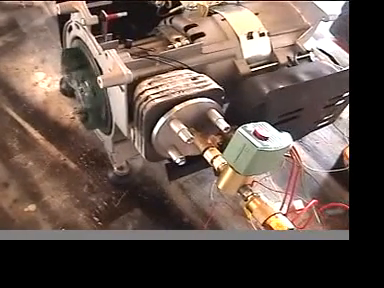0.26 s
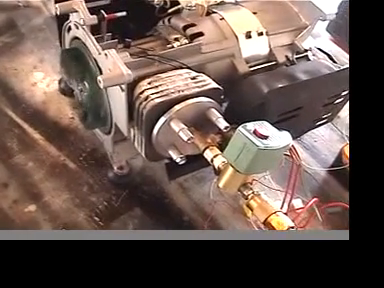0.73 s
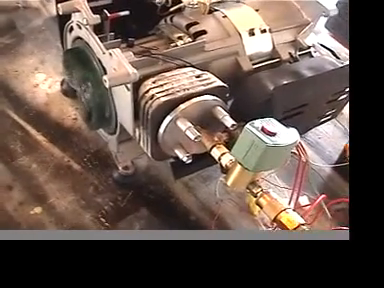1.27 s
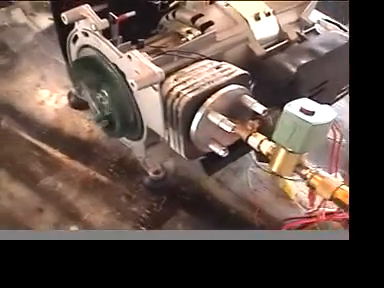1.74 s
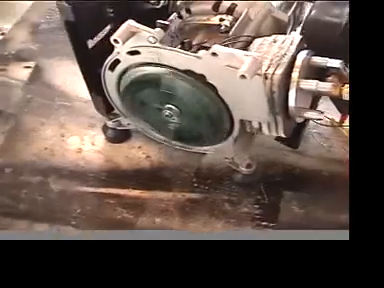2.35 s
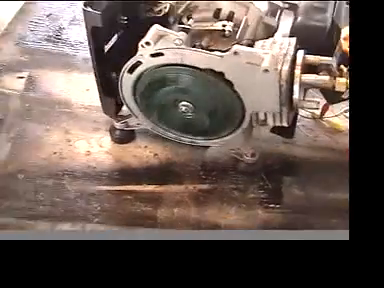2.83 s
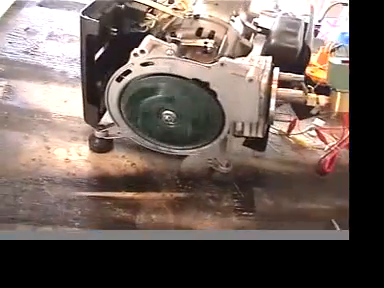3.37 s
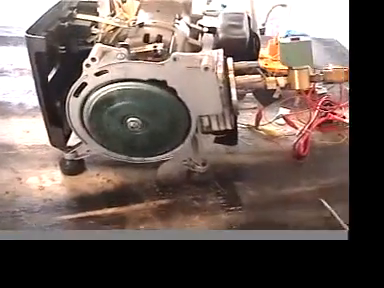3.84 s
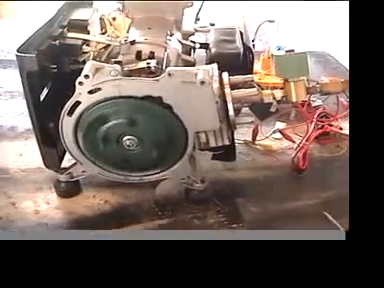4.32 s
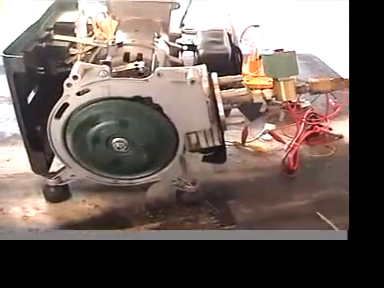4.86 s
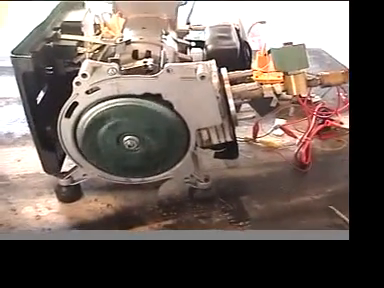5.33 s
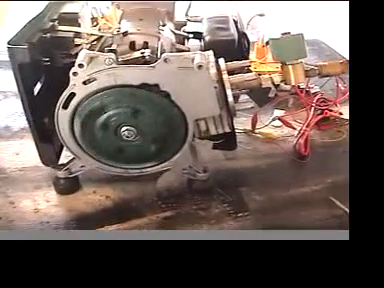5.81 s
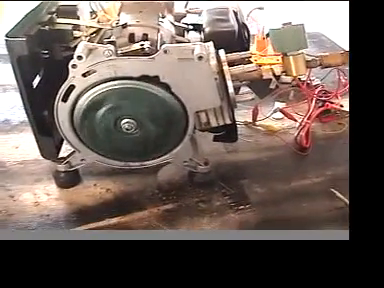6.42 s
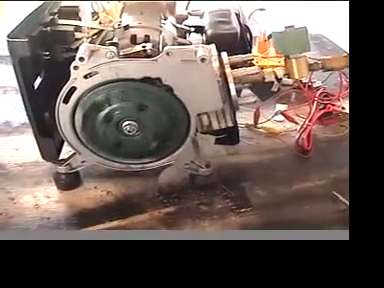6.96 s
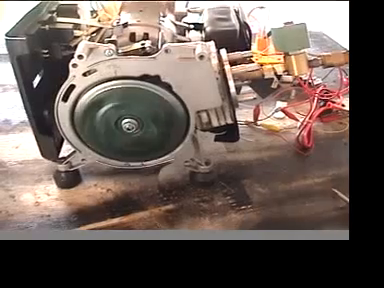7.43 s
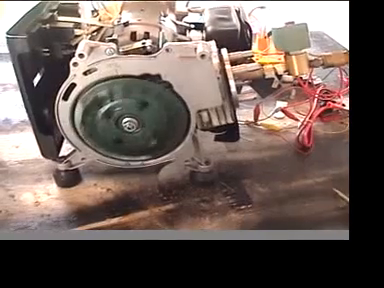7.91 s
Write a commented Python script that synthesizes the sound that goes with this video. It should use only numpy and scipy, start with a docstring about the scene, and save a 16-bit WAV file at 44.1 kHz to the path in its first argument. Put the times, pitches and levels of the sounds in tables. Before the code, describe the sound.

A small compressed-air piston engine runs steadily in a workshop, letting out sharp, bright hissing puffs about seven or eight times a second. Between puffs come a tiny contact spit, a light crank knock and a solenoid valve tick, with a rough low rumble under each puff. The close stereo microphone moves round the engine, so the hiss changes colour and the ticking and a short pipe ring grow clearer. The room adds a brief echo.

```python
"""Compressed-air engine in a workshop

A small piston engine runs on the floor, close to a hand-held stereo microphone that walks round it
from valve side to flywheel side. Each turn a contact spits, the crank knocks, the solenoid valve
ticks, and a sharp puff hisses out and shuts with a short ring of the pipe. The room carries each
puff on; a rough low rumble lies under each, and the peaks round off in the input stage."""
import sys
import numpy as np
from scipy import signal
from scipy.fft import rfft, irfft, next_fast_len
from scipy.io import wavfile
from scipy.ndimage import uniform_filter1d, map_coordinates

SR = 44100
rng = np.random.default_rng(int(sys.argv[2]) if len(sys.argv) > 2 else 0)


def transcribe(u):
    """Save the signal u as a 16-bit wav file named by the first command-line argument.

    u: samples, shape (n,) or (channels, n), limited to [-1, 1]; the rate is SR.
    q: integer samples, one column per channel.
    """
    v = np.clip(np.atleast_2d(u).T, -1, 1)
    q = np.round(v * 32767).astype(np.int16)
    wavfile.write(sys.argv[1], SR, q)


N = 360297

# One puff a turn. Each row: start in seconds, relative level in dB, length in ms.
PUFFS = [(-0.006, -11.5, 27.8), (0.1276, -11, 21.3), (0.2634, -10.5, 20), (0.3918, -11.5, 22.5),
         (0.5269, -11, 21), (0.6554, -11.5, 21), (0.7894, -11, 18.8), (0.9215, -10, 19),
         (1.0528, -10.5, 20.3), (1.1857, -11.5, 21.3), (1.3173, -11, 22.6), (1.4487, -11.5, 21.2),
         (1.582, -10, 19.5), (1.7133, -10.5, 19.6), (1.847, -9.5, 19), (1.979, -10, 20.7),
         (2.1101, -9.5, 18.3), (2.2434, -10, 18.7), (2.3732, -10.5, 20.5), (2.5087, -10.5, 21.5),
         (2.6385, -10.5, 20), (2.7762, -11, 20), (2.9022, -11, 20), (3.0384, -11.5, 20.2),
         (3.1677, -11.5, 22.5), (3.3023, -11.5, 20), (3.435, -11, 20.5), (3.5663, -10.5, 19.7),
         (3.6992, -11, 20.3), (3.832, -10.5, 20), (3.9648, -10, 18.5), (4.098, -11.5, 21.7),
         (4.2299, -10.5, 19.8), (4.3634, -10.5, 20), (4.4952, -9.5, 19.2), (4.6306, -10, 19.7),
         (4.7635, -9, 19.7), (4.8958, -10.5, 22.4), (5.0294, -10, 20), (5.1613, -9.5, 19.7),
         (5.2952, -9.5, 19.4), (5.427, -9.5, 19.2), (5.5595, -10, 21.2), (5.693, -9.5, 20.5),
         (5.8248, -10, 20.4), (5.96, -10, 19.8), (6.09, -10.5, 22), (6.226, -10, 20), (6.3559, -9.5, 19.4),
         (6.4916, -10.5, 18.4), (6.6228, -10, 19.3), (6.7569, -10, 19.5), (6.8893, -10, 19.4),
         (7.023, -10, 20.2), (7.1554, -10.5, 20.3), (7.2907, -11, 20), (7.422, -10, 18.6),
         (7.5563, -10, 19.8), (7.6874, -10.5, 20.8), (7.822, -11, 20.6), (7.9541, -10.5, 20.4),
         (8.0877, -10.5, 21), (8.2205, -10.5, 20)]
# The microphone's walk. Each row: time in seconds, place (0 valve side, 1 corner, 2 flywheel side),
# treble lift in dB.
WALK = [(0, 0.1, 1), (1.4, 0.077, 1), (1.9, 0.41, 0.61), (2.3, 0.85, 0), (3, 1, 0.59), (3.6, 1.42, 0.77),
        (4.4, 2, 1), (8.2, 1.98, 0.77)]
SPIT_LEAD_S, KNOCK_LEAD_S, TICK_LEAD_S = .073, .042, .0104  # how long before its puff each one sounds


def hiss():
    """The jet: noise in cavities of valve and casing, unlike on each side. Gives direct and room feed."""
    # The jet from the three places, and as the walls get it. Each row: frequency in Hz, level in dB.
    at_valve = [(880, -36), (1500, -14), (3220, -9.5), (4240, -9), (5440, -4), (6630, -9), (7240, -3.5),
                (8000, -8), (8490, -4.5), (10100, -5), (10800, 4), (11700, -6.5), (12600, 5), (13400, -4),
                (16000, -30)]
    at_corner = [(880, -52), (1500, -26), (2940, -4.5), (4240, -9), (5070, 3.5), (6430, -2), (7540, -7.5),
                 (10000, -4.5), (11400, -5.5), (13700, -11.5), (16000, -30)]
    at_wheel = [(880, -24), (1500, -20.5), (2560, -11.5), (4200, -5.5), (4500, -7.5), (5330, -2.5),
                (5830, -1), (6560, -6.5), (7240, -11), (8080, -4), (9560, -8), (10700, 0), (12100, -10),
                (13700, -12.5), (16000, -17)]
    at_walls = [(800, -12), (1500, -18.5), (2700, -5), (4000, -5.5), (5500, 1.5), (7500, -4.5),
                (10500, -2.5), (13000, -3.5), (15000, -15.5), (16500, -40)]
    # Cavity resonances on two sides. Each row: centre in Hz, width in Hz, lift in dB.
    valve_cavities = [(2650, 430, 7.5), (3290, 210, 6.5), (5280, 390, 6), (6500, 91, 0), (7800, 210, 1),
                      (8700, 160, 8), (9650, 270, 7.5), (10950, 230, -1.5), (12300, 220, -1),
                      (12600, 150, -20)]
    wheel_cavities = [(2860, 100, -6), (4880, 46, -3), (5200, 37, -10), (5820, 240, 5.5), (6470, 133, 8.5),
                      (7850, 240, 1.5), (9060, 270, 2), (10130, 850, 4.5), (13060, 200, 5), (13300, 170, 6)]
    # Stereo width. Each row: frequency in Hz, left-right correlation.
    likeness = [(1000, 0.074), (2500, 0.5), (5500, 0.82), (7200, 0.68), (10500, 0.72), (12000, 0.7),
                (13000, 0.66), (15000, 0.48)]
    # Stereo direction. Each row: frequency in Hz, phase lead of the left channel in radians.
    left_lead = [(3400, -0.34), (5000, -0.13), (7000, -0.26), (9000, -0.66), (10200, -1.4), (11400, -0.22),
                 (12000, -1.5), (13000, -0.72), (16000, 0.3)]

    def mid_side(hz):
        angle = np.arccos(np.clip(along(likeness, hz), -1, 1)) / 2
        return [np.cos(angle), np.sin(angle)]

    noise = rng.standard_normal((2, N))
    place, jet = place_at(np.arange(N) / SR), 0
    sides = [(at_valve, valve_cavities), (at_corner, wheel_cavities), (at_wheel, wheel_cavities)]
    for k, (colour, cavities) in enumerate(sides):
        mid, side = filtered(
            noise, lambda hz: amp(along(colour, hz)) * cavity_gain(cavities, hz) * mid_side(hz))
        nearness = np.clip(1 - np.abs(place - k), 0, 1)
        jet = jet + nearness * unit(np.array([mid + side, mid - side]))
    jet = filtered(jet, lambda hz: np.exp(.5j * along(left_lead, hz) * np.array([[1], [-1]])))
    air = flow(rise_s=.00054, fall_s=.0018, tilt_db=-.89) * flutter(rate_hz=350, depth_db=1.34)
    return jet * air, amp(-1.38) * air * coloured(noise[0], at_walls)


def flow(rise_s, fall_s, tilt_db):
    """Air through the valve: it opens fast, changes by tilt_db over the puff and shuts fast."""
    out, t = np.zeros(N), np.arange(SR // 20) / SR
    for s, db, ms in PUFFS:
        opening = 1 - np.exp(-t / rise_s)
        shutting = np.exp(-np.maximum(t - ms / 1000 + fall_s, 0) / fall_s)
        add(out, s - .0004, amp(db + tilt_db * t * 1000 / ms) * opening * shutting)
    return out


def flutter(rate_hz, depth_db):
    """Roughness: a gain that glides between random values."""
    knots = rng.standard_normal(int(N * rate_hz / SR) + 4)
    return amp(depth_db * map_coordinates(knots, [np.arange(N) * rate_hz / SR]))


def cavity_gain(cavities, hz):
    """Narrow peaks and dips on a flat response."""
    return amp(sum(db / (1 + (2 * (hz - centre) / width) ** 2) for centre, width, db in cavities))


def low_rumble():
    """A rough low noise burst under each puff, different in each channel, with a slow thump in both."""
    # Colour of the burst. Each row: frequency in Hz, level in dB.
    colour = [(20, -28), (60, -2.5), (150, -1.5), (400, 0), (870, -0.5), (1500, -1.5), (2500, -3),
              (4000, -20), (6000, -120)]
    noise = coloured(rng.standard_normal((2, N)), colour)
    thump, t = np.zeros(N), np.arange(SR // 10) / SR
    for s, db, ms in PUFFS:
        progress = t * 1000 / ms  # 1 as the valve shuts
        swing = np.where(progress < 1, 1.32 * progress ** 2.7 - .4, -.25 * np.exp((1 - progress) / .34))
        add(thump, s, amp(db - 17) * swing)
    thump = filtered(thump, lambda hz: 1 / (1 + 1j * hz / 160) ** 2)
    bursts = flow(rise_s=.0011, fall_s=.0013, tilt_db=3.1) * [flutter(250, 1.4), flutter(250, 1.5)]
    return amp([[-12.5], [-14.5]]) * noise * bursts + amp([[-.8], [.8]]) * thump


def pipe():
    """The air column pings as the valve shuts, and softly as it opens and after each spit."""
    # Pitch in Hz from the valve side and from the corner onward.
    pitches = (1103, 876.6)
    # Relative level in dB from valve side, corner and flywheel side.
    levels = (-36.5, -28.5, -22.5)
    out = np.zeros(N)
    for (s, db), (_, _, ms) in zip(each_turn(0, levels, scatter_db=1.5), PUFFS):
        hz = np.interp(place_at(s), [.3, .9], pitches)
        column = [(hz, 0, .055), (hz * .94, -11, .045), (hz * 1.08, -11, .04)]
        add(out, s + ms / 1000 + .001, amp(db + 6.5) * ring(column, .0012, .5, detune=.003))
        add(out, s + .003, amp(db - 7) * ring(column, .001, 1.5))
        add(out, s - SPIT_LEAD_S + .001, amp(db - 6) * ring(column, .002, 1.2, detune=.006))
    return out


def solenoid():
    """The plunger slaps its stop just before the air comes; it sings until it seats, then bounces once."""
    # Plunger modes. Each row: frequency in Hz, level in dB, seconds to fall 60 dB.
    plunger = [(2620, -12, .03), (3050, -1, .05), (3330, -5, .04), (3600, -12, .03), (1700, -22, .02)]
    # Relative level in dB from valve side, corner and flywheel side.
    levels = (-31.5, -17.5, -15.5)
    out, t = np.zeros(N), np.arange(SR // 20) / SR
    seating = 1 - .78 / (1 + np.exp(-(t - .0033) / .000052))
    for s, db in each_turn(TICK_LEAD_S, levels, scatter_db=.7):
        add(out, s, amp(db + 4) * ring(plunger, .0006, .61, detune=.0053) * seating)
        add(out, s + .0038, amp(.36 * db - 19.5) * ring(plunger, .000095, 2))  # bounce
        click = np.diff(rng.standard_normal(len(t) + 1))
        add(out, s, amp(.33 * db - 19.5 - 60 * t / .032) * click)
    return out


def crank():
    """Play in the bearings: a light high touch, the main knock, rebounds on the case, a late soft thud."""
    # Case modes. Each row: frequency in Hz, level in dB, seconds to fall 60 dB.
    case_modes = [(174, -8, 0.047), (326.3, -11, 0.15), (682, -1.5, 0.024), (1050, -1, 0.052),
                  (1820, -2, 0.034), (2617, 6, 0.02), (3006, 2, 0.021), (3398, 13.5, 0.012),
                  (4150, 2.5, .02)]
    # Relative level in dB from valve side, corner and flywheel side.
    levels = (-22.3, -21.5, -20)
    thud_modes = [(140, -1.5, .043), (258, -3, .03)]
    out, t = np.zeros(N), np.arange(SR // 20) / SR
    for s, db in each_turn(KNOCK_LEAD_S, levels, scatter_db=.9):
        add(out, s - .011, amp(db - 9.5) * ring(case_modes[5:7], .001, 1.7, detune=.034))
        for late_s, blow_db in ((-.003, 2), (-.0008, -6.5), (.0015, 0), (.006, -6.5), (.014, -9.5)):
            at = s + late_s + rng.normal(0, .0006)
            add(out, at, amp(db - 12 + blow_db) * ring(case_modes, .001, 1.67, detune=.047))
            clatter = uniform_filter1d(rng.standard_normal(len(t)), size=4)
            add(out, at, amp(db - 5 + blow_db - 60 * t / .029) * clatter)
        add(out, s + .0188, amp(-30.5 - 4.3 * place_at(s)) * ring(thud_modes, .0022, 1.3))
    return out


def spit():
    """A contact spits, short and bright, over a small thump heard from the valve side only."""
    # Colour of the spit. Each row: frequency in Hz, level in dB.
    spray = [(1500, -60), (3000, -11), (4500, -26), (9500, -16), (11400, 1.5), (12400, -5), (13500, 6),
             (15000, -21)]
    # Relative level in dB from valve side, corner and flywheel side.
    levels = (-16.5, -26.5, -25)
    gate, thump, t = np.zeros(N), np.zeros(N), np.arange(SR // 50) / SR
    burst = amp(-60 * t / .037) * (.15 + .93 / (1 + np.exp((t - .003) / .0005)))
    pulse = (1 - t / .00081) * np.exp(-t / .00093) * (1 - np.exp(-t / .000082))
    for s, db in each_turn(SPIT_LEAD_S, levels, scatter_db=3.5):
        nearness = np.clip(1 - place_at(s), 0, 1)
        add(gate, s - .0013, amp(db + .5) * burst)
        add(thump, s - .001, -nearness * amp(db + .5) * pulse)
    return gate * coloured(rng.standard_normal(N), spray) + thump


def ring(modes, attack_s, scatter_db, detune=.01):
    """One blow on modes of (Hz, dB, t60 s); loose parts never ring twice at quite the same pitch."""
    t = np.arange(SR // 20) / SR
    tones = 0
    for hz, db, t60 in modes:
        decay = amp(db + rng.normal(0, scatter_db) - 60 * t / t60)
        tones = tones + decay * np.sin(2 * np.pi * hz * rng.normal(1, detune) * t)
    return tones * (1 - np.exp(-t / attack_s))


def each_turn(lead_s, levels_db, scatter_db):
    """Time and level of a sound that comes lead_s before every puff, as heard from the microphone."""
    times = np.transpose(PUFFS)[0] - lead_s
    levels = np.interp(place_at(times), range(len(levels_db)), levels_db)
    return zip(times, levels + scatter_db * rng.standard_normal(len(times)))


def place_at(s):
    """Where the microphone stands at time s."""
    times, places, _ = np.transpose(WALK)
    return np.interp(s, times, places)


def treble_drift(x):
    """The treble above 8 kHz dips about 1 dB midway through the walk, then returns."""
    times, _, lift_db = np.transpose(WALK)
    gain = amp(np.interp(np.arange(N) / SR, times, lift_db))
    treble = filtered(x, lambda hz: 1 / (1 + (8000 / (hz + 1)) ** 8))
    return x + (gain - 1) * treble


def room(x, hold_s):
    """The walls answer, each band dying at its own speed; the pattern shifts as the microphone drifts."""
    # The workshop's reverberation. Each row: frequency in Hz, seconds to fall 60 dB, level in dB,
    # share that reaches the other channel.
    walls = [(100, 0.36, -10, 0.3), (526, 0.27, -7.5, 0.28), (980, 0.46, -2.5, 0.51),
             (2550, 0.32, -4.5, 0.39), (4740, 0.33, -3.5, 0.054), (9300, 0.29, -3, 0.01),
             (14100, 0.29, -4, 0.013)]
    out, step = np.zeros((2, N + SR)), np.arange(N) / SR / hold_s
    for k in range(int(step[-1]) + 2):  # crossfade to a fresh tail every hold_s
        hz, t, bands = signal.stft(rng.standard_normal((2, SR // 3)), SR, nperseg=256)
        tail = signal.istft(bands * amp(-60 * t / along(walls, hz)[:, None]), SR, nperseg=256)[1]
        tail *= 1 - np.exp(-np.arange(tail.shape[1]) / SR / .0033)  # the first walls are some way off
        span = np.flatnonzero(np.abs(step - k) < 1)
        part = x[span] * np.cos(np.pi / 2 * (step[span] - k))
        wet = signal.fftconvolve(part[None], tail / np.linalg.norm(tail[0]), axes=1)
        out[:, span[0]:][:, :wet.shape[1]] += wet
    out = filtered(out[:, :N], lambda hz: amp(along(walls, hz, column=2)))
    return out + filtered(out[::-1], lambda hz: along(walls, hz, column=3))


def background():
    """A faint steady rush behind the engine."""
    # Its colour. Each row: frequency in Hz, level in dB.
    colour = [(20, -6), (60, -25), (300, -5), (1000, 11), (4000, 7), (15000, -11)]
    return amp(-46.5) * coloured(rng.standard_normal((2, N)), colour)


def amp(db):
    return 10 ** (np.asarray(db) / 20)


def unit(x):
    return x / np.sqrt(np.mean(x ** 2) + 1e-20)


def along(points, hz, column=1):
    """One column of (Hz, value, ..) rows, interpolated over log frequency."""
    columns = np.transpose(points)
    return np.interp(np.log(hz + 1), np.log(columns[0] + 1), columns[column])


def filtered(x, response):
    """x through a complex frequency response."""
    size = next_fast_len(N + SR // 2)
    return irfft(rfft(x, size) * response(np.fft.rfftfreq(size, 1 / SR)), size)[..., :N]


def coloured(noise, colour):
    """Noise shaped by (Hz, dB) rows, at unit RMS."""
    return unit(filtered(noise, lambda hz: amp(along(colour, hz))))


def add(track, s, sound):
    """Lay a sound on the track from time s on."""
    k = round(s * SR)
    part = sound[max(-k, 0):][:max(N - max(k, 0), 0)]
    track[max(k, 0):][:len(part)] += part


def scene():
    """The engine close up, pipe and metal slightly left, with the workshop behind."""
    jet, jet_to_walls = hiss()
    pings = pipe()
    metal = solenoid() + spit() + crank()
    rush = background()
    direct = jet + pings * amp([[1.1], [-1.1]]) + metal * amp([[.8], [-.8]])
    reverb = room(jet_to_walls + .51 * metal + .11 * pings, hold_s=.3)
    return treble_drift(direct + reverb) + low_rumble() + rush


def record(dry):
    """The input stage rounds off the loudest peaks; the treble rolls off and ends at the band limit."""
    ceiling, rolloff_hz, top_hz = .92, 15200, 15900
    rounded = dry / (1 + np.abs(dry / ceiling) ** 5) ** (1 / 5)
    return filtered(rounded, lambda hz: (hz < top_hz) / (1 + (hz / rolloff_hz) ** 24))


dry = scene()
out = record(dry)
transcribe(out)
```